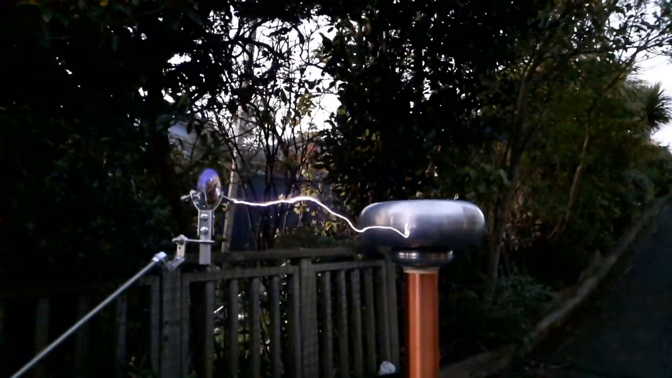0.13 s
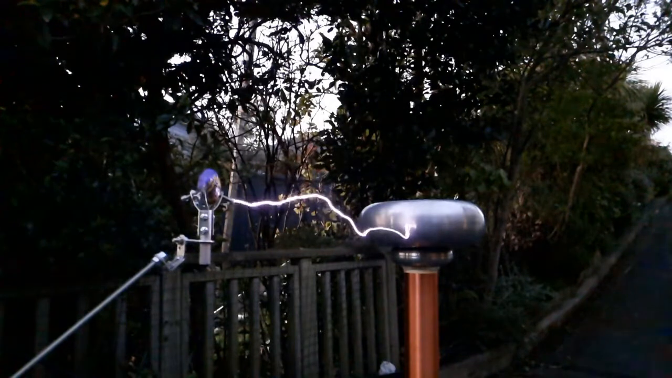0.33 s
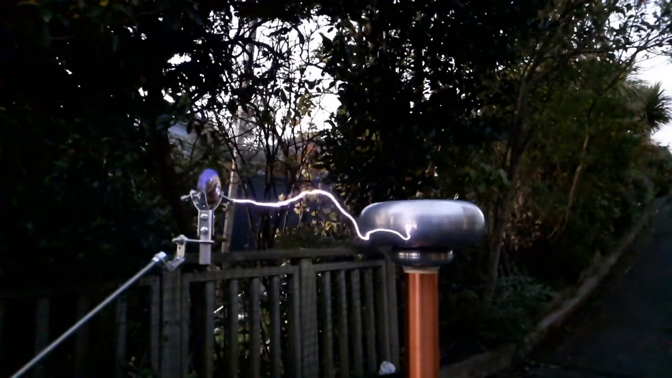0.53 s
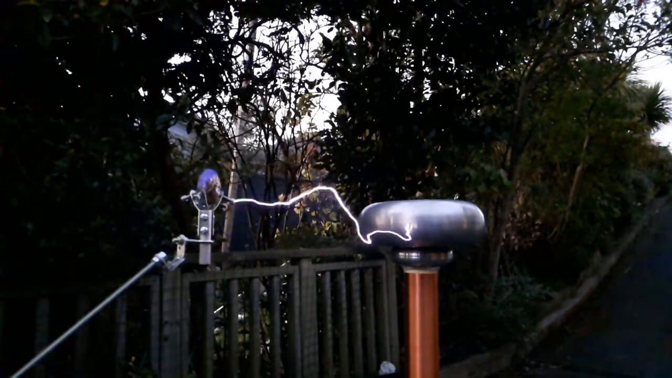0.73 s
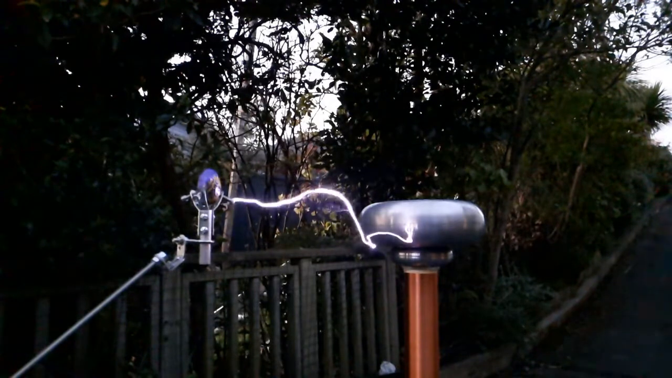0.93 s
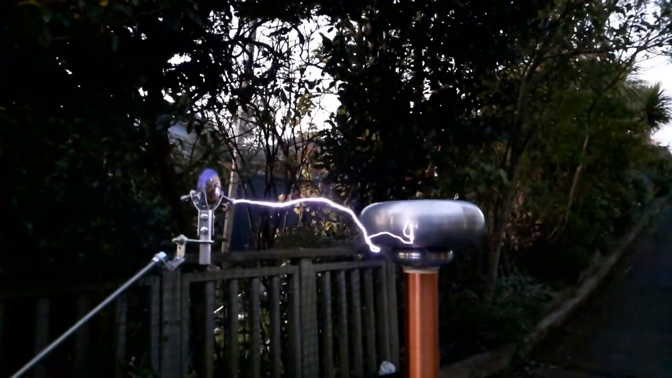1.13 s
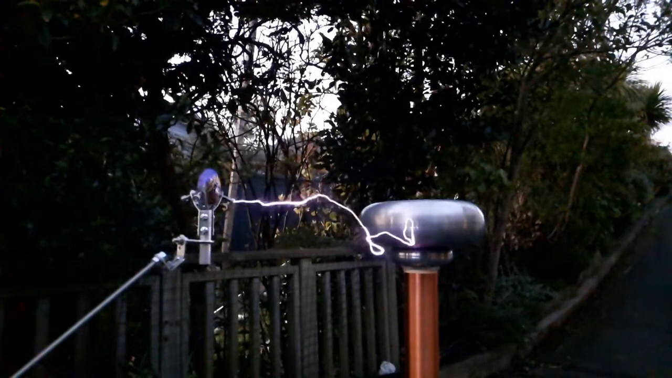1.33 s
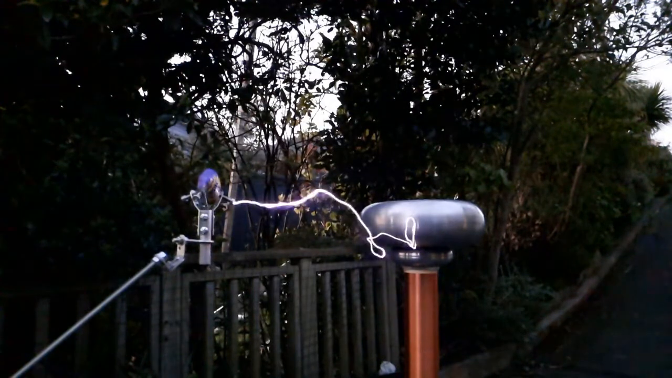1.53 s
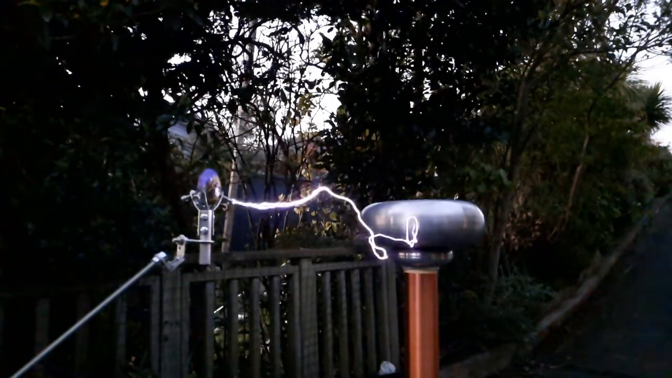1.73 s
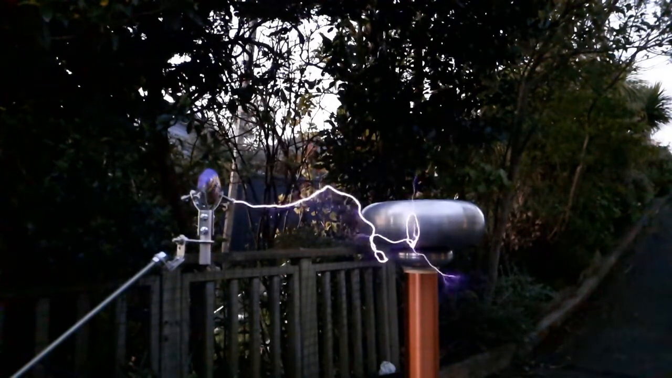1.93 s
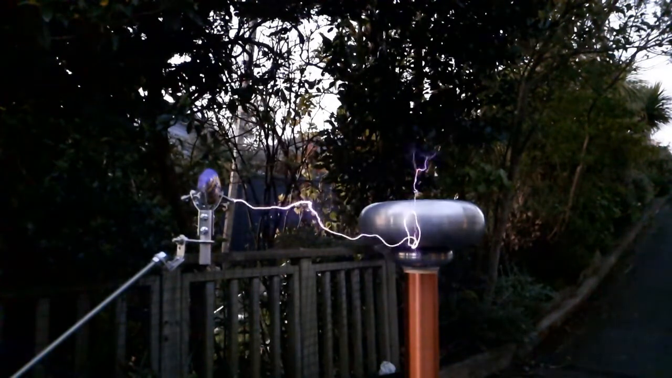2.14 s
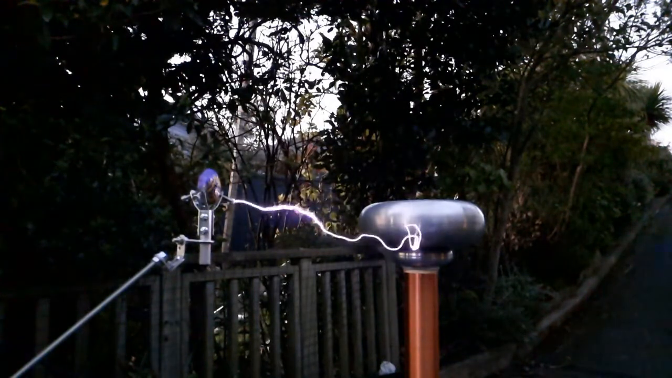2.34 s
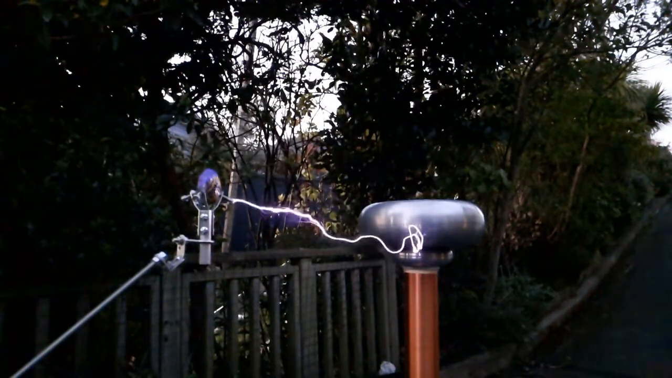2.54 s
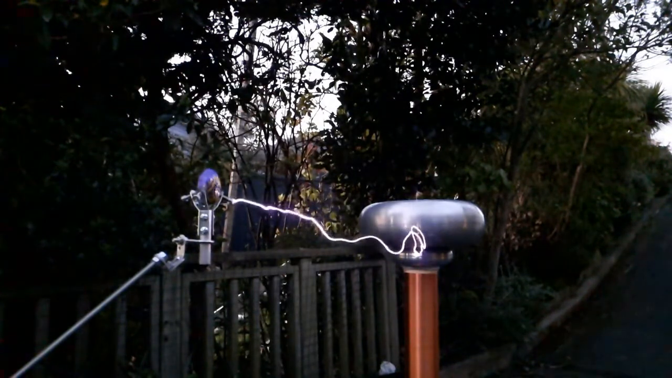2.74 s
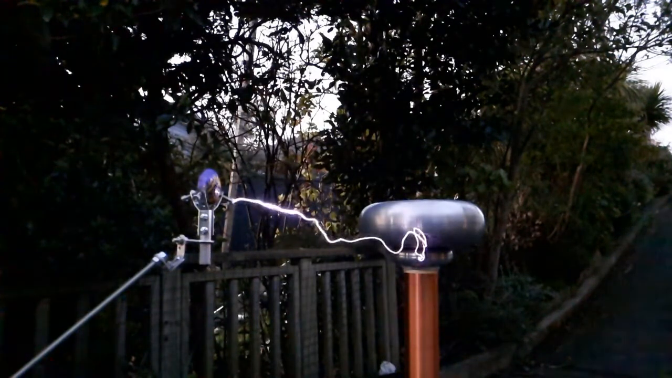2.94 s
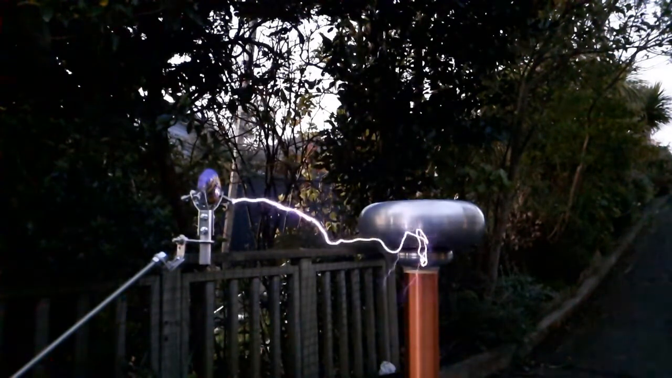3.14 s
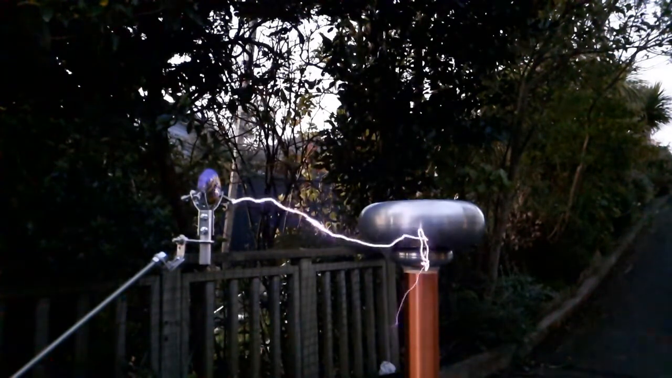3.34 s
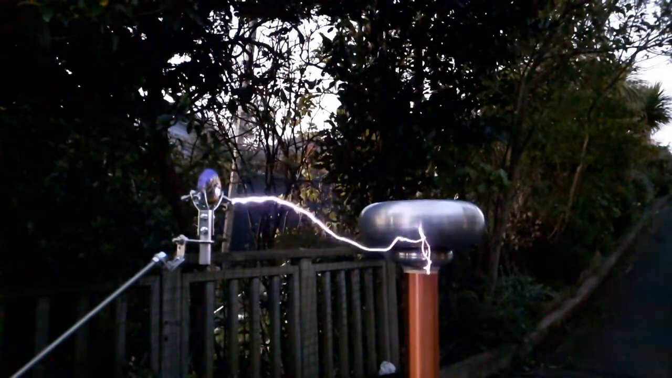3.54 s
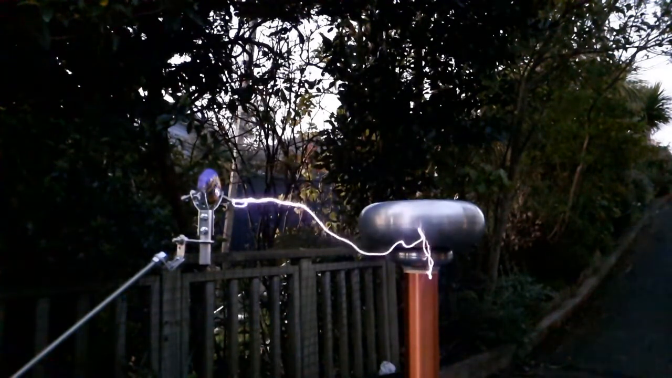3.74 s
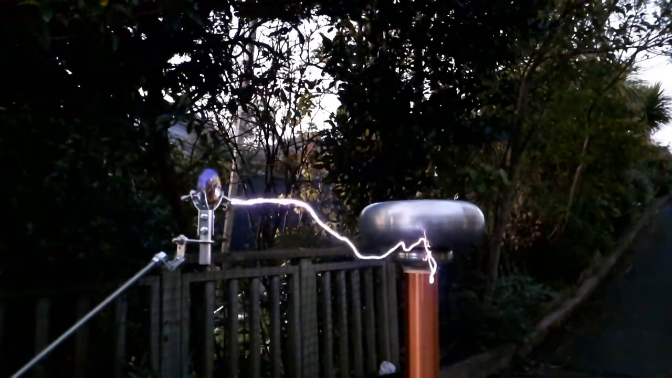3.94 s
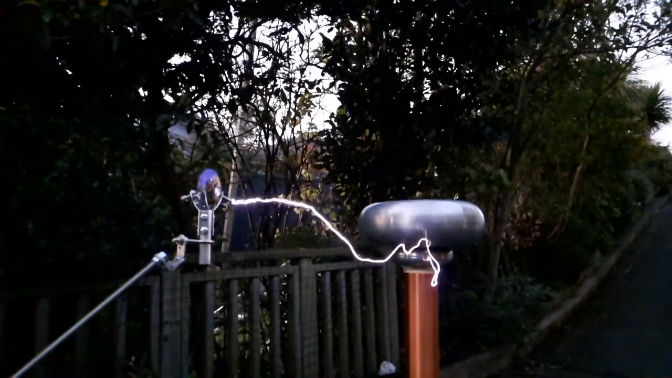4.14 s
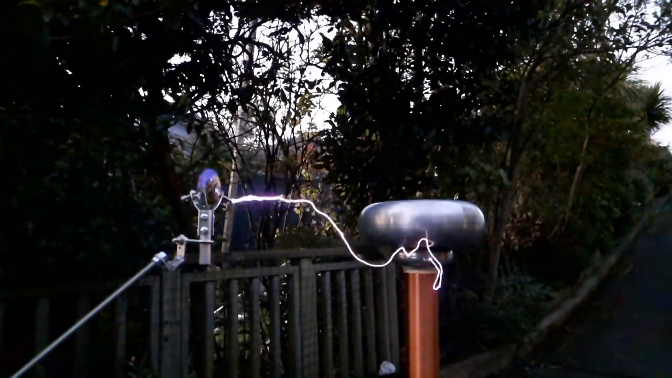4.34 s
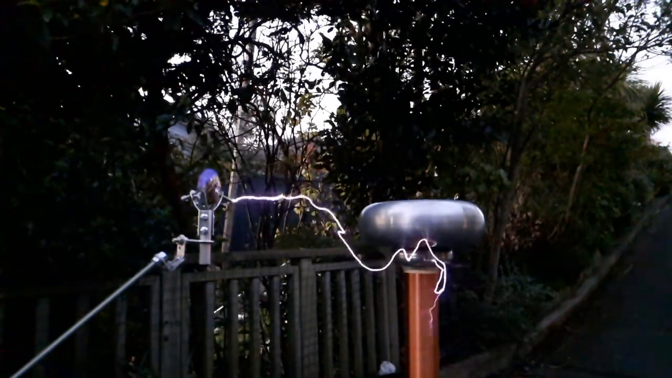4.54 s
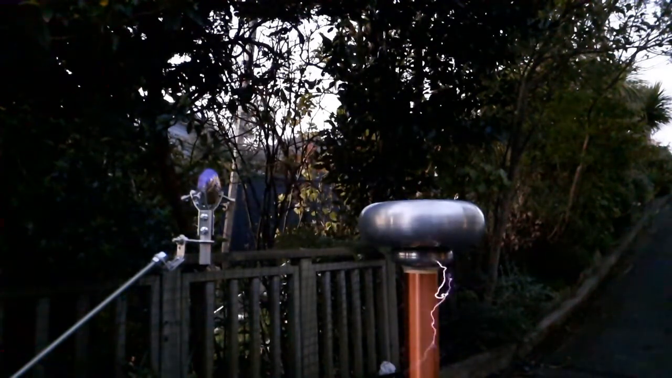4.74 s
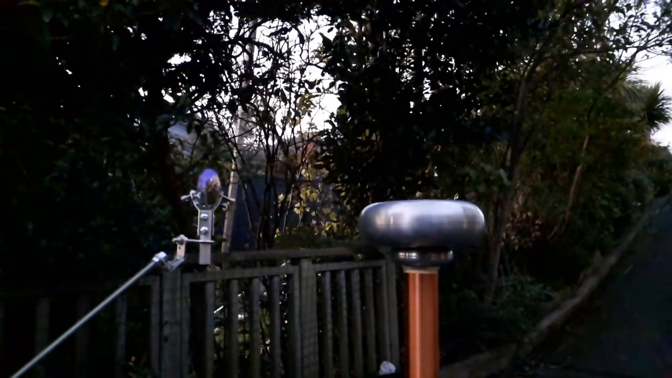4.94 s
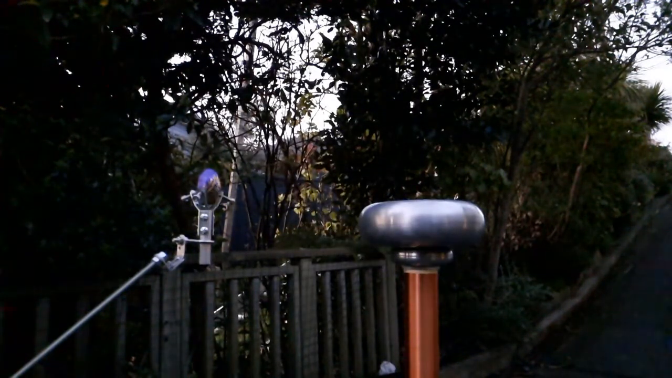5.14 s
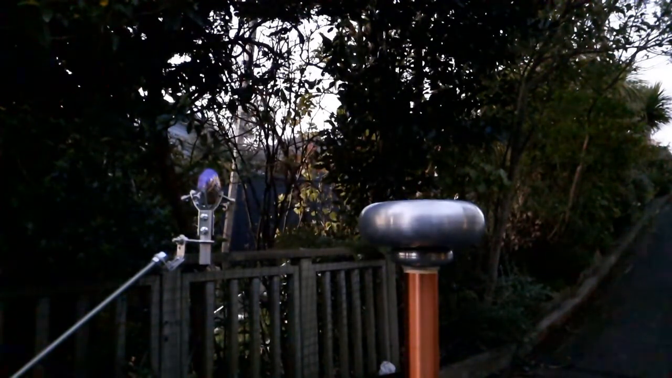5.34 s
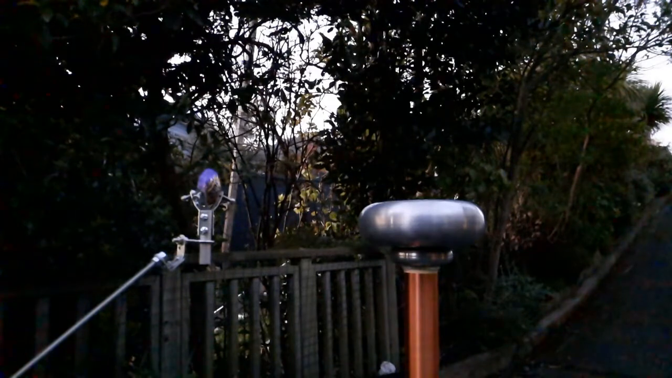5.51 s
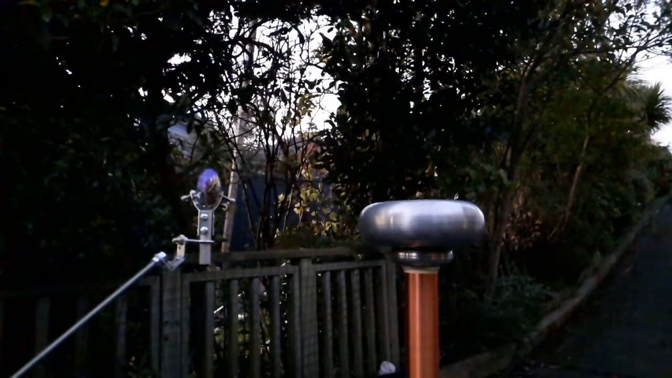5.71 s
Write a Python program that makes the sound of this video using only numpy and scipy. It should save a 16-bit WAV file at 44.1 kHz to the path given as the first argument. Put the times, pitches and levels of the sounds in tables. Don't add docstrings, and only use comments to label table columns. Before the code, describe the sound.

A high-voltage coil throws a continuous arc to a metal stand in a garden. The sound is a loud, rough low buzz of separate cracks, about 54 per second, with metallic ringing and overloaded low thumps. It flickers briefly, weakens after 4.6 seconds and stops by 5. Dull echoes and a low hum decay into quiet air, with one faint tick near 5.5. Close stereo pickup, slowed and gritty.

```python
import sys
import numpy as np
from scipy import signal
from scipy.fft import rfft, irfft, next_fast_len
from scipy.io import wavfile
from scipy.ndimage import map_coordinates

SR = 44100
rng = np.random.default_rng(int(sys.argv[2]) if len(sys.argv) > 2 else 0)


def store_wav(level_fs):
    pcm = np.round(np.clip(np.atleast_2d(level_fs), -1, 1) * 32767)
    wavfile.write(sys.argv[1], SR, pcm.T.astype(np.int16))


def undo_db(level):
    steps = np.asarray(level, float) / 20
    return 10 ** steps


N = 254456
SPARK_HZ = 53.6122
FADE_S, STOP_S = 4.62, 4.99
RIGHT_LAG_S = 0.0011576


def clock(length_s):
    return np.arange(int(length_s * SR)) / SR


def fade(t, t60_s):
    return np.exp(-np.log(1000) * t / t60_s)


def colour(x, points):
    size = next_fast_len(x.shape[-1])
    hz, db = np.transpose(points)
    bin_hz = np.arange(size // 2 + 1) * SR / size
    gain = undo_db(np.interp(np.log(bin_hz + 1), np.log(hz), db))
    return irfft(rfft(x, size) * gain, size)[..., :x.shape[-1]]


def train(times_s, sizes, shape):
    x = np.zeros(N + SR)
    np.add.at(x, (times_s * SR).astype(int), sizes)
    return signal.fftconvolve(x, shape)[:N]


def column(table, index, times_s):
    rows = np.array(table)
    return np.interp(times_s, rows[:, 0], rows[:, index])


# hz, level_db_per_hz
GARDEN_NOISE = [(24, -55), (40, -6), (102, -26), (153, -8.5), (295, -30.5), (649, -18), (1810, -30),
                (2810, -17), (3200, -34), (4160, -65), (7040, -120)]


def quiet_garden():
    x = colour(rng.standard_normal((2, N)), GARDEN_NOISE)
    return x / np.sqrt(np.mean(x ** 2)) * undo_db(-55)


# hz, level_db, t60_s
YARD_MODES = [(107, -1.5, 17), (215, -12.5, 1.97), (268, 3, 2), (375, -3, 2.0), (429, -1, 1.2),
              (536, -4, 2.7), (697, -12, 1.8)]


def yard_hum(beats_s, db):
    t = clock(0.9906)
    sides = []
    for side in range(2):
        ring = np.zeros(len(t))
        for hz, level_db, t60_s in YARD_MODES:
            harmonic_hz = round(hz / SPARK_HZ) * SPARK_HZ
            tone = np.sin(2 * np.pi * (harmonic_hz * t + 0.2 * rng.random()))
            ring += undo_db(level_db) / t60_s * fade(t, t60_s) * tone
        sides.append(train(beats_s, undo_db(db - 31.5), ring))
    return np.array(sides)


# hz, level_db
NEAR_ECHO = [(40, -28), (200, 0.5), (500, 5.5), (930, -5), (1250, 5.5), (1700, 1.5), (2400, 3), (2850, 2),
             (3300, 1.5)]
# hz, level_db
FAR_ECHO = [(40, -21), (150, -7), (500, 1), (900, 2.5), (1400, 1), (2100, -6.5), (3300, -4.5)]


def garden_echo(x):
    t = clock(1.5)
    near_env = (1 - np.exp(-t / 0.0053)) * fade(t, 0.67)
    far_env = (1 - np.exp(-t / 0.059)) * fade(t, 2.77)
    near = colour(rng.standard_normal((2, len(t))) * near_env, NEAR_ECHO)
    far = colour(rng.standard_normal((2, len(t))) * far_env, FAR_ECHO)
    paths = near + undo_db(-8.5) * far
    paths = paths / np.sqrt(np.sum(paths ** 2) / 2)
    return signal.fftconvolve(x, paths, axes=1)[:, :N]


def echoes(crack, ring):
    lead = int(round(54 / SPARK_HZ * SR))
    earlier = garden_echo(crack * (np.arange(N) < lead))[:, lead:]
    return garden_echo(crack + 0.75 * ring) + np.pad(earlier, ((0, 0), (0, lead)))


# start_s, arrival_delay_ms, usual_kick (amplitude), overload_unrest (0-3)
CHANNEL = [(0.0, 8.26, 0.23, 1.5), (0.31, 7.34, 0.19, 1.2), (0.5, 8.3, 0.21, 1), (0.9, 8.3, 0.16, 1.6),
           (1.05, 9.6, 0.15, 1.4), (1.22, 9.4, 0.36, 2), (1.4, 9.92, 0.21, 1), (1.8, 8.63, 0.17, 1.9),
           (2.05, 8.5, 0.03, 1.5), (2.27, 9.2, 0.055, 1.17), (2.6, 8.48, 0.097, 2), (3.0, 8.83, 0.097, 1.3),
           (3.28, 8.7, 0.094, 1.2), (3.44, 7.4, 0.015, 1.6), (3.59, 8.25, 0.097, 1.8),
           (4.04, 7.65, 0.028, 1.5), (4.3, 8.15, 0.073, 1.5), (4.6, 7.3, 0.14, 0.88)]
# start_s, extra_kick, slump_left, slump_right (amplitudes)
OVERLOADS = [(0.046, -0.15, -0.12, -0.079), (0.064, -.03, 0.06, -0.21), (0.382, -0.044, -0.27, 0.13),
             (0.456, -0.038, 0.17, 0.25), (0.494, -.045, -0.17, -0.09), (0.568, 0.028, 0.23, 0.125),
             (0.587, -0.017, -0.08, -0.044), (1.539, -.05, -0.2, 0.0047), (1.781, 0.031, -0.073, -0.15),
             (1.837, -.06, -0.09, -0.14), (1.874, 0.11, 0.16, 0.098), (1.911, -0.041, -0.02, -0.12),
             (2.06, 0.036, 0.14, 0.104), (2.097, -0.051, -0.26, -0.15), (2.509, 0.051, 0.29, -0.16),
             (2.527, -0.015, -0.3, 0.11), (2.621, -0.13, -0.208, -0.05), (2.826, -0.06, -0.26, -0.19),
             (2.844, 0.059, 0.022, 0.2), (2.882, -0.049, -0.17, -0.075), (3.049, -0.09, -0.12, 0.049),
             (3.44, -.08, -0.16, -0.2), (3.571, -0.03, -0.12, -0.21), (3.832, -0.055, -0.34, 0.09),
             (3.869, -.02, -0.076, -0.39), (4.037, -.01, -0.16, -0.063), (4.074, 0.086, 0.205, 0.183),
             (4.13, -.085, -0.15, -0.088), (4.671, -0.16, -0.15, 0.13), (4.69, -.06, -0.11, -0.2)]


def thumps(times_s, db):
    t = clock(0.12)
    count = len(times_s)
    slump = np.exp(-t / 0.016) * np.sin(2 * np.pi * 40 * t)
    bounce = t / 0.0003 * np.exp(1 - t / 0.0004)
    drive_db = np.minimum(db - np.median(db), 1) - 18 * np.maximum(times_s - FADE_S, 0)
    drive = undo_db(drive_db)
    spread = np.array([0.051, 0.02, 0.052, 0.045, 0.038, 0.12])
    chance = rng.standard_normal((count, 6)) * spread * drive[:, None]
    chance[:, :4] *= column(CHANNEL, 3, times_s)[:, None]
    rows = np.array(OVERLOADS)
    hard = np.abs(times_s[:, None] - rows[:, 0]).argmin(axis=0)
    chance[hard, :2] = rows[:, 1:2]
    chance[hard, 2:4] = rows[:, 2:]
    bounce_s = times_s[:, None] + 0.0021 + 0.00384 * rng.random((count, 2))
    usual = column(CHANNEL, 2, times_s) * drive
    out = []
    for c, (rise_s, polarity) in enumerate([(0.0012, 1), (0.0017, -0.77)]):
        kick = t / rise_s * np.exp(1 - t / rise_s)
        at_s = times_s + c * RIGHT_LAG_S
        kicks = train(at_s, polarity * usual + chance[:, c], kick)
        slumps = train(at_s, chance[:, 2 + c], slump)
        out.append(kicks + slumps + train(bounce_s[:, c], chance[:, 4 + c], bounce))
    return signal.sosfilt(signal.butter(1, 12.0, "high", fs=SR, output="sos"), out)


def stray_tick():
    t = clock(0.05)
    top_hz = STAND_MODES[2][0]
    tick = np.sin(2 * np.pi * top_hz * t) * t / 0.01 * np.exp(1 - t / 0.0095)
    return train(np.array([5.482]), undo_db(-46), tick)


# hz, level_db, t60_s
STAND_MODES = [(1060, 1, .024), (2110, -6, .016), (2900, -4, .016)]
# start_s, ring_db (relative to the crack)
STRIKE = [(0, 3), (.3, 1), (.55, -6), (.8, 5), (1.1, 10), (1.82, 11), (1.95, 2), (2.25, -2), (2.45, -6),
          (3.3, -6), (3.5, 2), (3.75, -4), (4.1, 5), (4.5, 5), (4.7, -3), (4.9, -3)]


def stand(times_s, db):
    t = clock(0.06)
    modes = sum(undo_db(level_db) * fade(t, t60_s) * np.sin(2 * np.pi * hz * t)
                for hz, level_db, t60_s in STAND_MODES)
    ring = (1 - np.exp(-t / 0.0033)) * modes
    blow_db = db + column(STRIKE, 1, times_s) + 3.5 + 2.05 * rng.standard_normal(len(times_s))
    blows = (-1) ** np.arange(len(times_s)) * undo_db(blow_db)
    return np.array([train(times_s + lag_s, blows, ring) for lag_s in (0.001, 0.00193)])


# start_s, crack_level_db
POWER = [(0.0, -27), (0.23, -30.5), (0.42, -31.5), (0.6, -30.5), (0.9, -30.5), (1.0, -30), (1.45, -31),
         (1.95, -30.5), (2.2, -29), (2.9, -29.5), (3.3, -28), (3.63, -28), (3.97, -29), (4.59, -27),
         (4.75, -31.5), (4.95, -46)]
# centre_s, loss_db, half_length_s
MISFIRES = [(0.094, 3, 0.017), (0.353, 1.5, 0.023), (0.565, 5.5, 0.024), (1.88, 11, 0.017),
            (2.717, 2.5, 0.018), (2.947, 1, 0.01), (3.01, -1, 0.015)]


def discharge_db(times_s):
    loss_db = sum(db * np.exp(-((times_s - centre_s) / half_s) ** 2)
                  for centre_s, db, half_s in MISFIRES)
    return column(POWER, 1, times_s) - loss_db


# hz, level_db_per_hz
CRACK = [(60, -65), (200, -4.5), (500, -8.5), (930, -8), (1100, -6), (1250, -15), (1450, -6.5), (1900, -4),
         (2400, -6), (2850, 0.5), (3300, -9.5)]


def cracks(times_s, db):
    t = clock(0.018)
    count = len(times_s)
    memory, kept = 0.902, 0.42
    burst = (1 - np.exp(-(t / 0.0013) ** 2)) * np.exp(-(t / 0.0043) ** 2)
    burst = burst + 0.17 * np.exp(-((t - 0.011) / 0.002) ** 2)
    bends = rng.standard_normal((count + 30, 2, len(t)))
    bends = np.sqrt(1 - memory ** 2) * signal.lfilter([1], [1, 0, -memory], bends, axis=0)[30:]
    fresh = rng.standard_normal((count, 2, len(t)))
    for v in (bends, fresh):
        v[:, 1] = np.sin(0.9) * v[:, 0] + np.cos(0.9) * v[:, 1]
    size = undo_db(db + 1.2 * rng.standard_normal(count))
    sway = np.sin(np.cumsum(0.12 * rng.standard_normal(count)))
    lag_s = RIGHT_LAG_S + 0.00035 * sway
    out = np.zeros((2, N + SR))
    for k, start_s in enumerate(times_s):
        snap = size[k] * burst * (np.sqrt(kept) * bends[k] + np.sqrt(1 - kept) * fresh[k])
        for c in range(2):
            i = int((start_s + c * lag_s[k]) * SR)
            out[c, i:i + len(t)] += snap[c]
    return colour(out[:, :N], CRACK) * undo_db(26.5)


def scene():
    beats_s = np.arange(int(STOP_S * SPARK_HZ)) / SPARK_HZ
    times_s = beats_s + column(CHANNEL, 1, beats_s) / 1000
    db = discharge_db(times_s)
    crack = cracks(times_s, db)
    ring = stand(times_s, db)
    background = quiet_garden() + yard_hum(beats_s, db) + undo_db(0.5) * echoes(crack, ring)
    return background + thumps(times_s, db) + stray_tick() + ring + crack


def roll_off(x):
    return signal.sosfilt(signal.butter(12, 15700, fs=SR, output="sos"), x)


def record(dry):
    hold_hz, top_hz = 12003.825, 3010
    band = signal.sosfilt(signal.ellip(14, 0.3, 95, top_hz, fs=SR, output="sos"), dry)
    held = np.floor(np.arange(N) * hold_hz / SR) * SR / hold_hz
    steps = np.array([map_coordinates(side, [held], order=3, mode="nearest") for side in band])
    return roll_off(steps)


dry = scene()
out = record(dry)
store_wav(out)
```